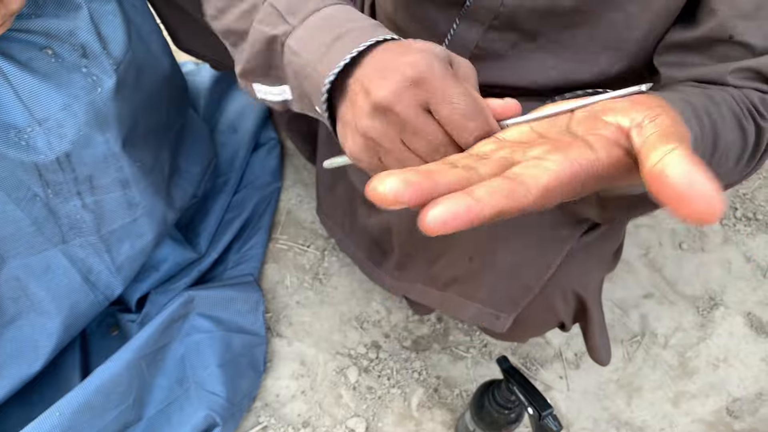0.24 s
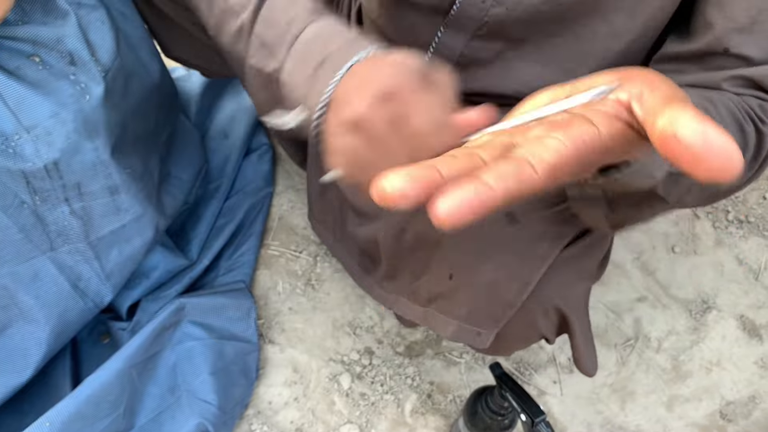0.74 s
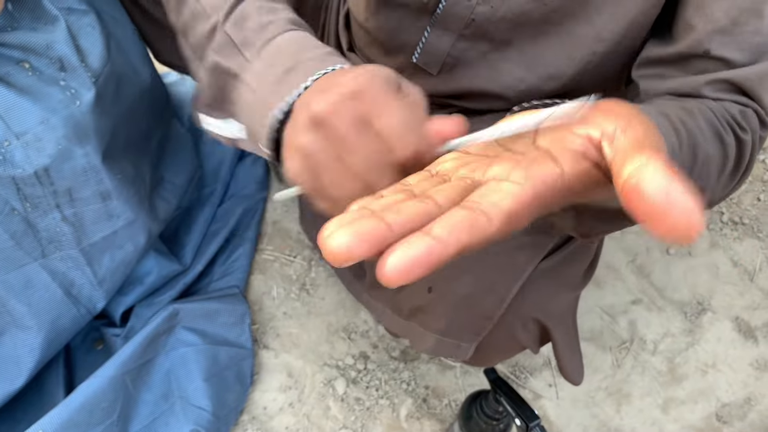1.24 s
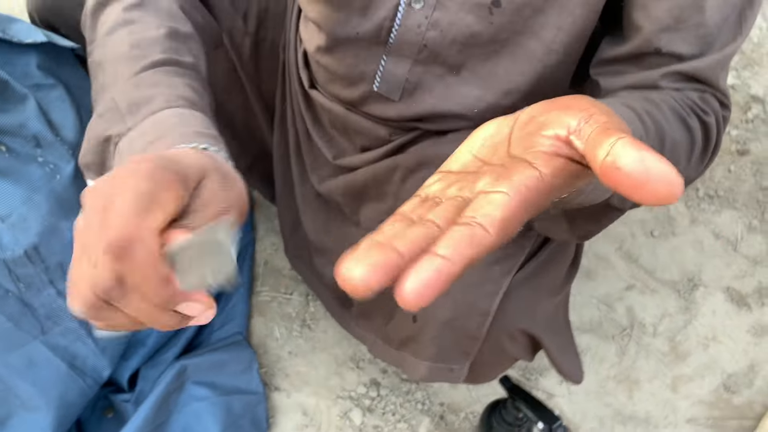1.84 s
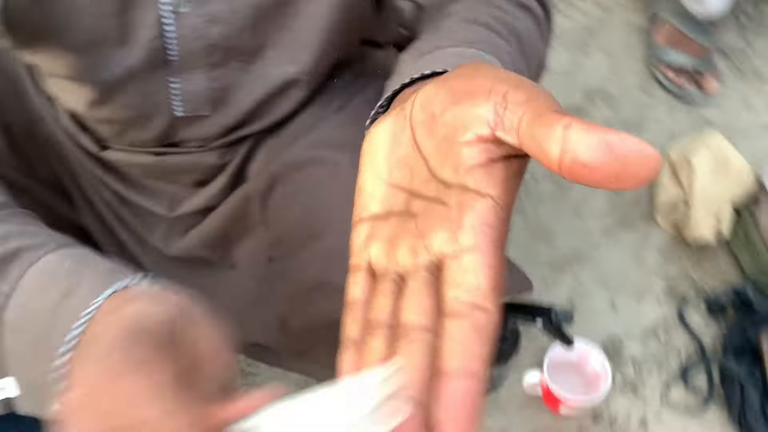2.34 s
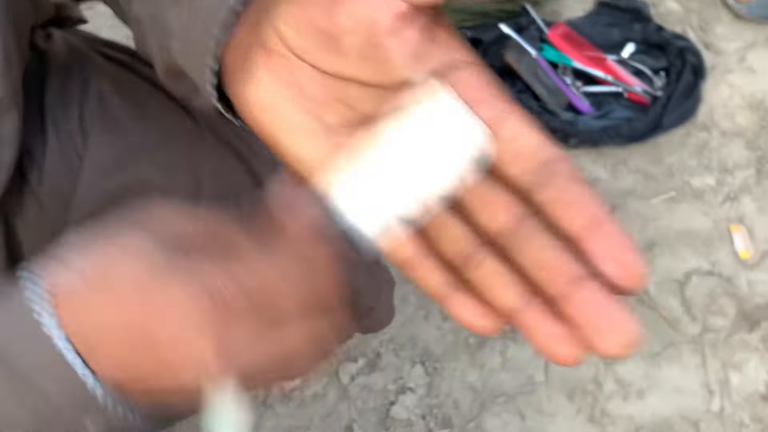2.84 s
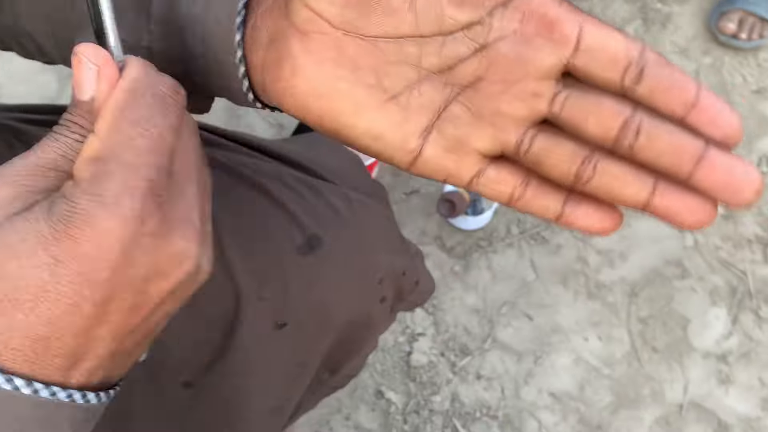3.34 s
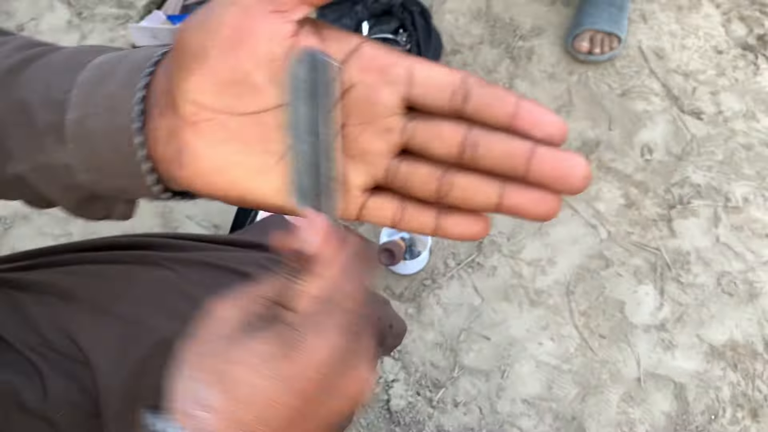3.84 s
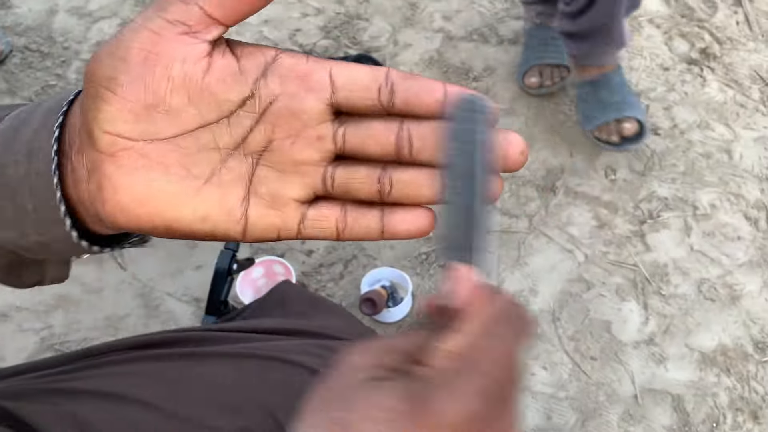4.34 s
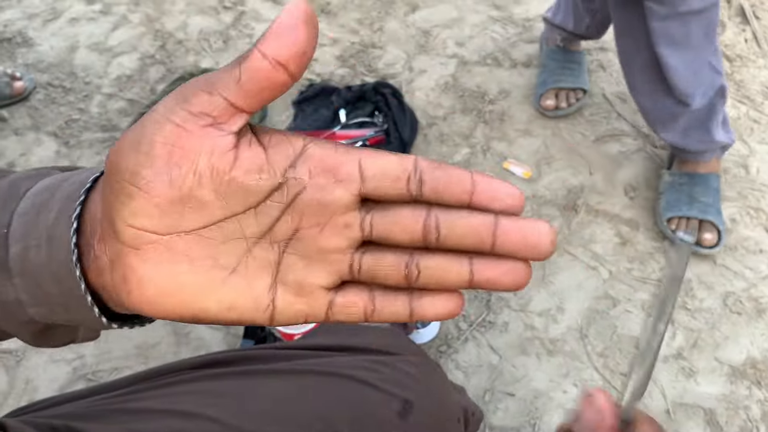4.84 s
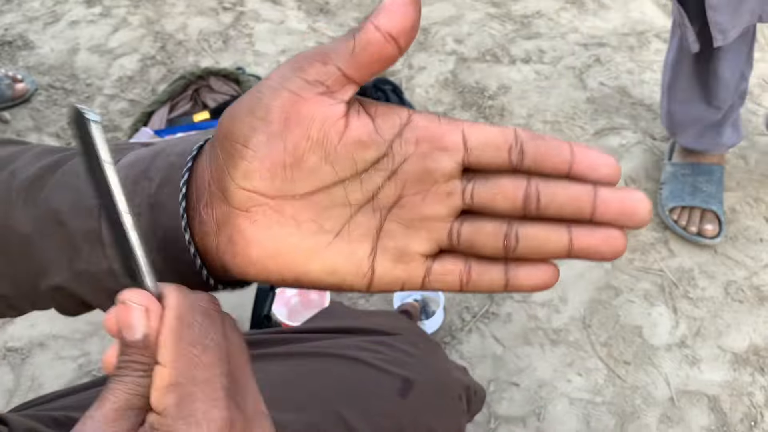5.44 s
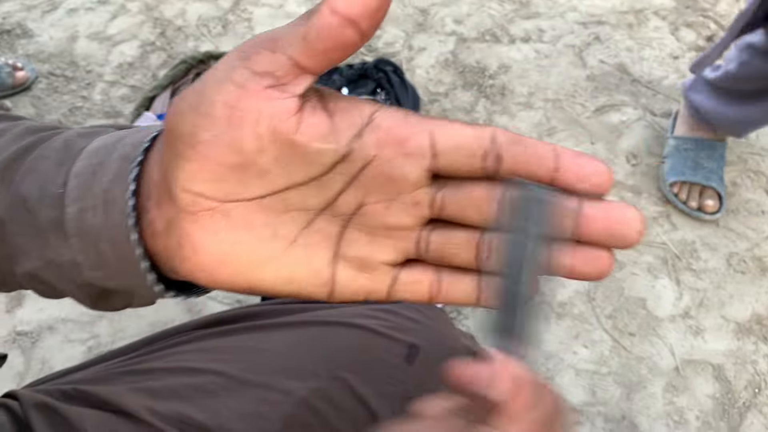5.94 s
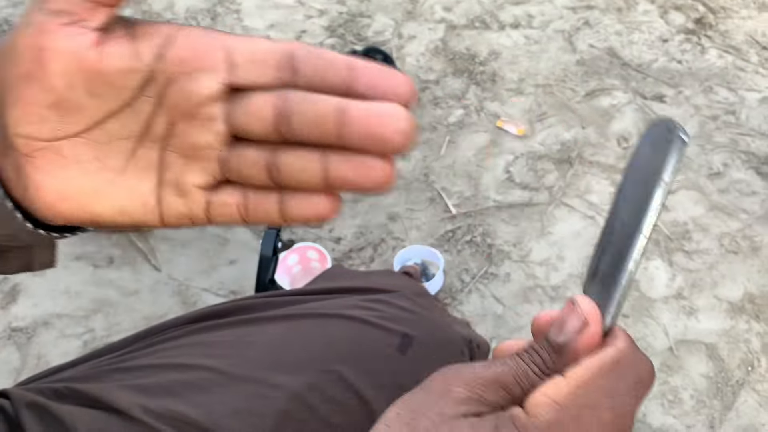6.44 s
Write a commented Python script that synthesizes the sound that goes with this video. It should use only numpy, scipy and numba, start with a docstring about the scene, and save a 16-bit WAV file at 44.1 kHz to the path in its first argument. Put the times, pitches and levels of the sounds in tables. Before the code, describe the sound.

A blade slaps and scrapes over skin in a steady, quick to-and-fro rhythm from start to finish. Each pass is a short, bright, grainy hiss with a squeaky rasp, sometimes snagging, ended by a chattering flick and a fast-dying metallic ring. Early strokes are softer with clearer rings; later ones tick and bite more sharply. Sleeve cloth bumps dully. Distant engine hum and low street rumble, heard by a close handheld phone with almost no reverberation.

```python
"""Outdoors by a quiet street, a straight razor is stropped to and fro on an open palm, close under a phone.
Each stroke lands with a tick and a soft clap (noise bursts), hisses and rasps over the skin (grainy noise,
a sliding resonance), catches here and there, and flicks off so that the thin blade rings (decaying sines).
Far off lie an engine of two wavering lines, a murmur of filtered noise and a thin whine.
Two microphone ports hear it, the right one nearer and resonant."""
import sys
import numpy as np
from scipy import signal
from scipy.fft import rfft, irfft
from scipy.io import wavfile
from scipy.ndimage import uniform_filter1d
from numba import njit

SR = 44100
rng = np.random.default_rng(int(sys.argv[2]) if len(sys.argv) > 2 else 0)


def master_out(mix):
    """Clip the mix to full scale and print it as 16-bit PCM to the path in sys.argv[1]."""
    frames = np.transpose(np.atleast_2d(mix))
    ceiling = np.clip(frames, -1, 1)
    pcm = np.round(ceiling * 32767).astype(np.int16)
    wavfile.write(sys.argv[1], SR, pcm)


N = 294147
T = np.arange(N) / SR

# Far whine. Each row: time in seconds, centre in Hz, level in dB.
WHINE = [(6.2, 2300, -83), (6.42, 2220, -64.5), (6.52, 2130, -65), (6.6, 1850, -71), (6.67, 1780, -74)]
# Street murmur over time. Each row: time in seconds, level in dB before its wander and the pan.
STREET_LEVEL = [(0, -51), (.25, -56.5), (.6, -52), (1.5, -50.5), (2.5, -47.5), (3.3, -45.5), (4.2, -48.5),
                (5.2, -53), (6, -48), (6.67, -53)]
# Distant engine, two lines creeping upward. Each row: first pitch in Hz, rise in Hz per second,
# level in dB about the engine's.
ENGINE_LINES = [(61.6, 1.3, -2.5), (55.2, 0.31, -7)]
# Engine over time. Each row: time in seconds, level in dB before its waver and the pan.
ENGINE_LEVEL = [(0, -47), (.5, -52), (1, -39), (1.5, -47.5), (2, -43), (3, -44), (4, -43.5), (5, -40),
                (5.5, -47.5), (6, -51.5), (6.67, -52)]
# Spectra of the noises; only the shape counts. Each row: frequency in Hz, density in dB per Hz.
STREET = [(20, -15), (48, 7), (75, 4.5), (110, -7.5), (200, -14.5), (400, -21.5), (800, -27.5), (1150, -25),
          (1600, -32.5), (2150, -29.5), (3000, -35.5), (6000, -39), (15800, -41), (16500, -98)]
BUMP = [(70, -25.5), (130, 3.5), (210, -2), (330, -12.5), (600, -28.5), (1500, -36)]
TICK = [(5000, -43), (7500, -30.5), (9200, 2.5), (10500, 1.5), (13000, 6), (13900, -9), (15300, 7.5),
        (16300, -13.5), (17000, -50.5)]
CLAP = [(350, -11.5), (750, -6.5), (1100, -0.5), (1500, 2.5), (2000, -6.5), (3200, -6.5), (6000, -37.5)]
THUD = [(70, -5.5), (150, -4), (280, -3.5), (450, 5.5), (700, -2), (1200, -20), (3000, -37)]
HISS = [(5500, -34.5), (7200, -4), (8200, -10.5), (10200, 7.5), (12600, 1.5), (13900, -3.5), (15300, 8),
        (15750, -26), (16100, -53)]
RASP = [(1800, -17), (2500, -7), (3000, -7), (3500, 2), (4600, -0.5), (5400, 0), (6400, 7.5), (7300, 5.5),
        (8600, -10), (11000, -47.5)]
RUB = [(80, -25), (180, 1), (350, -2), (800, 2.5), (1200, 6), (2200, -1.5), (3500, -2.5), (6000, -40)]
# The blade's modes above its main ring. Each row: frequency in Hz when the ring is at BLADE_HZ,
# relative level in dB, time to fall 60 dB in seconds.
BLADE = [(3530, -5, .055), (4810, -2, .045), (6230, -2, .04), (7730, -4, .05), (9555, 0, .07),
         (11785, 4, .1), (13300, -7, .06), (15190, 1, .06)]
# Strokes towards the wrist, set down lightly, swelling and flicked off. Each row: start, end and hardest
# pressure in seconds (if past the end, it is never reached), rasp pitch there in Hz, then in dB: touch,
# scrape, flick, ring and brightness (added to the hiss). Scrape, flick and ring are reference levels.
INWARD = [(0, .04, 0.013, 3800, -42, -30, -18, -16, -5.5),
          (.532, 0.615, 0.554, 4220, -50, -32.5, -18.5, -19, -5.5),
          (1.01, 1.092, 1.05, 3850, -30, -31.5, -21.5, -24.5, -5.5),
          (1.481, 1.559, 1.52, 3970, -31, -31.5, -24, -30.5, -5),
          (1.908, 1.984, 2.01, 4420, -35, -31.5, -20, -22.5, -4.5),
          (2.373, 2.448, 2.55, 4640, -29.5, -31.5, -25, -23.5, -2),
          (2.797, 2.878, 2.86, 3800, -27.5, -31.5, -23.5, -35, -1.5),
          (3.224, 3.302, 3.28, 3930, -23.5, -30, -19, -39, 1),
          (3.647, 3.727, 3.8, 4300, -30, -29, -24, -60, -2),
          (4.061, 4.154, 4.04, 3980, -25, -28.5, -21.5, -34.5, -3),
          (4.498, 4.586, 4.56, 4810, -21, -28.5, -18, -35, 0),
          (4.92, 4.997, 5.12, 3600, -28, -30, -13, -40, -3.5),
          (5.338, 5.42, 5.3, 4920, -26.5, -29.5, -15, -27.5, -0.5),
          (5.729, 5.809, 5.75, 4160, -26.5, -30, -19, -44, 0.5),
          (6.133, 6.209, 6.4, 4300, -20.5, -33.5, -14.5, -51, 3.5)]
# Strokes towards the fingers: slap on the heel of the hand, glide, bite, run off. Each row: slap, glide,
# bite and end in seconds, then in dB: steel tick, skin clap, palm thud, bite, scrape, flick, ring and
# brightness (added to the hiss). Bite, scrape, flick and ring are reference levels.
OUTWARD = [(0.1439, 0.302, 0.38, .42, -25.5, -41, -45.5, -41, -37, -43, -50, 2),
           (0.7092, .785, .856, .921, -20, -41.5, -51, -34, -41, -34.5, -42, 3.5),
           (1.1734, 1.242, 1.304, 1.356, -23.5, -41, -42.5, -27.5, -35.5, -52, -50, 2.5),
           (1.664, 1.657, 1.729, 1.792, -13.5, -42.5, -41.5, -33.5, -41.5, -44, -61, 4),
           (2.0713, 2.158, 2.172, 2.262, -27.5, -37.5, -51, -29.5, -32, -40.5, -49, 2.5),
           (2.549, 2.537, 2.628, 2.7, -17, -33.5, -32.5, -23, -40, -32.5, -37, 8),
           (2.972, 2.993, 3.038, 3.096, -13.5, -35.5, -54, -20.5, -34.5, -36, -43, 4),
           (3.391, 3.426, 3.476, 3.537, -14, -42, -52, -36.5, -31.5, -56, -55, 2.5),
           (3.822, 3.822, 3.882, 3.936, -18.5, -36, -39, -23.5, -34, -27, -63, 3.5),
           (4.242, 4.251, 4.317, 4.371, -18.5, -42.5, -46.5, -23.5, -34, -26.5, -46, 0.5),
           (4.66, 4.677, 4.722, 4.769, -14.5, -52, -48.5, -22, -30.5, -19, -26, 2.5),
           (5.0813, 5.084, 5.142, 5.182, -14, -37, -43.5, -20, -30.5, -15, -35, 1.5),
           (5.4974, 5.487, 5.571, 5.603, -15.5, -45.5, -54, -24, -31.5, -25, -43, 1),
           (5.88, 5.88, 5.946, 5.973, -12, -40.5, -44.5, -16.5, -28, -18, -31.5, 2),
           (6.2935, 6.291, 6.36, 6.388, -12.5, -35, -43.5, -20.5, -29.5, -23.5, -36, 2.5)]
# Stray taps as the blade is turned over. Each row: time in seconds, steel tick in dB, skin clap in dB.
TAPS = [(0.6727, -44, -59), (1.635, -31, -51.5), (1.8272, -36, -55.5), (1.853, -33.5, -68),
        (2.0408, -29.5, -48), (2.0567, -36, -48), (2.296, -37, -58.5), (2.346, -37.5, -65),
        (3.183, -34.5, -63), (4.022, -26, -77), (4.4157, -39, -57), (4.441, -26, -60)]
# The edge snags hard on a crease. Each row: time in seconds, reference level in dB, brightness in dB.
SNAGS = [(1.063, -30, -8), (1.537, -27, -1), (2.398, -36.5, 18), (2.651, -35, 7), (3.898, -34.5, 4),
         (4.106, -29.5, -1), (4.329, -28, 10), (4.738, -22, -9), (5.957, -23.5, 3), (6.15, -40, 21),
         (6.165, -39, 17), (6.182, -31, 3.5)]

# friction about the scrape level, in dB: inward at start, hardest, end; outward at glide, grip, bite, end
IN_HISS_DB, IN_RASP_DB, IN_RUB_DB = (-9.5, 0.5, -5.5), (-10, -2, 1), (-25, -24, -22.5)
OUT_HISS_DB, OUT_RASP_DB = (-4, -9.5, -1, -5), (-12.5, -14.5, -3.5, 1.5)
OUT_RUB_DB = (-20, -24, -17.5, -25)
# the rasp's resonance: at an inward start and end, at the four outward points, and in a bite
IN_START_HZ, IN_END_HZ, OUT_RASP_HZ, BITE_HZ = 5650, 4700, (5040, 5870, 5370, 3800), 5450
RASP_Q, RASP_WANDER = 3.5, .1  # wander in natural log of pitch
GRIP_S = 0.028  # the grip of an outward stroke starts to build this long before it bites
TOUCH_CLAP_DB, LIGHT_THUD_DB = -28, -2  # clap about a light touch's tick; thud about a light clap
GRIT_DB, GRIT_SPREAD_DB = -8.5, 1.5  # chance snags about the scrape (inward) or bite (outward)
BLADE_HZ, RING_SPREAD_HZ = 5360, 27
RING_T60_S, RING_REF_DB, RING_T60_DOUBLES_DB = .14, -34.5, 21.5  # the louder a ring, the faster it dies
# overtone level at RING_REF_DB, its spread, and its rise in dB per dB of the ring
OVERTONE_DB, OVERTONE_SPREAD_DB, OVERTONE_SHARE = -46.5, 5, 0.213
IN_RING_PAN_DB, OUT_RING_PAN_DB = -3, 3.5  # main ring, left minus right
TWIRL_DB, TWIRL_PER_S = 3, 45  # the ring flutters as the blade is turned
SLEEVE_LAG_S, SLEEVE_DB = .022, -25  # after each contact, about the scrape level
SCATTER_T60_S = .24
PORT_LAG = 8  # samples by which the left port hears later
TOP_HZ = 16700


def undb(db):
    """Decibels to gain."""
    return 10 ** (np.asarray(db) / 20)


def unit(x):
    """Scale to rms 1."""
    return x / np.sqrt(np.mean(x ** 2))


def add(out, s, sound):
    """Mix a short sound in at time s."""
    i = max(int(s * SR), 0)
    out[:, i:i + sound.shape[-1]] += sound[..., :N - i]


def colour(x, points, size=1024):
    """Causal, minimum-phase filter through (Hz, dB) points that keeps the power of white noise."""
    hz, db = np.transpose(points)
    f = np.maximum(np.arange(size // 2 + 1) * SR / size, 1)
    cepstrum = irfft(np.log(undb(np.interp(np.log(f), np.log(hz), db))))
    # fold the cepstrum forward in time so that nothing sounds early
    cepstrum[1:size // 2] *= 2
    cepstrum[size // 2 + 1:] = 0
    response = irfft(np.exp(rfft(cepstrum)))
    response = response / np.linalg.norm(response)
    return signal.fftconvolve(x, response[None], axes=1)[:, :N]


def pair(apart, count=N):
    """Two white noises of rms 1: alike at apart 0, unrelated at 1."""
    mid, side = rng.standard_normal((2, count))
    return np.array([mid + apart * side, mid - apart * side]) / np.sqrt(1 + apart ** 2)


def walk(rate):
    """Smooth random wander of spread 1, with about rate new values a second."""
    k = max(int(SR / rate), 2)
    steps = np.repeat(rng.standard_normal(N // k + 1), k)
    return unit(uniform_filter1d(steps, k)[:N])


@njit
def sweep(x, hz, q):
    """Band-pass whose centre moves every sample."""
    y = np.empty_like(x)
    for c in range(2):
        band, low = 0., 0.
        for i in range(x.shape[1]):
            g = np.tan(np.pi * hz[i] / SR)
            v = (band + g * (x[c, i] - low)) / (1 + g * (g + 1 / q))
            band, low, y[c, i] = 2 * v - band, low + 2 * g * v, v / q
    return y


def bursts(times, levels_db, rise_s, fall_s, span_s, apart):
    """Clusters of micro-slips that swell to each time and die; the level is their rms over span_s."""
    out, lead = np.zeros((2, N)), .02
    t = np.arange(int(4 * lead * SR)) / SR - lead
    shape = np.exp(np.where(t < 0, t / rise_s, -t / fall_s))
    for s, db in zip(times, levels_db):
        slips = unit(pair(apart, count=len(t)) * shape)
        add(out, s - lead, slips * undb(db) * np.sqrt(span_s * SR / len(t)))
    return out


def whine():
    """A thin, narrow band of noise far away, sinking in pitch at the end."""
    s, hz, db = np.transpose(WHINE)
    band = sweep(pair(.5), np.interp(T, s, hz), 25.)
    return unit(band) * undb(np.interp(T, s, db))


def drone(hz, rise_hz_per_s, db, waver_db=2.5):
    """One wavering line of a far engine, a sine that creeps upward."""
    phase = 2 * np.pi * (np.cumsum(hz + rise_hz_per_s * T) / SR + rng.random())
    level_db = db + np.interp(T, *np.transpose(ENGINE_LEVEL)) + waver_db * walk(12)
    return np.sqrt(2) * np.sin(phase) * undb(level_db)


def street():
    """Low rumble and a faint murmur with the far engine, a little to the left."""
    gain = undb(np.interp(T, *np.transpose(STREET_LEVEL)) + 1.44 * walk(9))
    murmur = colour(pair(.25), STREET, size=8192) * gain
    engine = sum(drone(*line) for line in ENGINE_LINES)
    return (murmur + engine) * undb(np.array([[1.0], [-1.0]]))


def sleeve():
    """Loose cloth flaps dully with the swing of the arm, just after each contact."""
    s, scrape_db = np.transpose([(start, db) for start, *_, db, _, _, _ in INWARD + OUTWARD])
    flaps = bursts(s + SLEEVE_LAG_S, scrape_db + SLEEVE_DB,
                   rise_s=0.0084, fall_s=0.0038, span_s=0.029, apart=0.15)
    return colour(flaps, BUMP)


def landings(rasp_db=-7):
    """Steel meets the palm: a sharp tick with some rasp, then the clap of skin and the thud of flesh."""
    slaps = [(s, tick, clap, thud) for s, _, _, _, tick, clap, thud, *_ in OUTWARD]
    light = [(s, tick, tick + TOUCH_CLAP_DB) for s, _, _, _, tick, *_ in INWARD] + TAPS
    slaps += [(s, tick, clap, clap + LIGHT_THUD_DB) for s, tick, clap in light]
    s, tick_db, clap_db, thud_db = np.transpose(slaps)
    tick = bursts(s, tick_db, rise_s=0.00033, fall_s=0.00099, span_s=0.0011, apart=0.068)
    rasp = bursts(s, tick_db + rasp_db, rise_s=0.00031, fall_s=0.0027, span_s=0.00066, apart=1.0)
    clap = bursts(s + 0.00044, clap_db, rise_s=0.00013, fall_s=0.0018, span_s=0.015, apart=0.26)
    thud = bursts(s + 0.0011, thud_db, rise_s=0.00014, fall_s=0.0026, span_s=0.01, apart=0.18)
    return colour(tick, TICK) + colour(rasp, RASP) + colour(clap, CLAP) + colour(thud, THUD)


def chatter(x, q=45, direct_db=-3):
    """Quick slips on the nearly free blade take on the colour of its modes."""
    ringing = 0
    for hz, db, _ in BLADE:
        ringing = ringing + undb(db) * signal.lfilter(*signal.iirpeak(hz, q, fs=SR), x, axis=1)
    return unit(unit(ringing) + undb(direct_db) * unit(x)) * x.std()


def blade_ring(flick_ring_db, pan_db):
    """The freed blade rings in its modes, each a dying sine; their pitch shifts together with the grip."""
    t = np.arange(int(.3 * SR)) / SR
    swell = 1 - np.exp(-t / 0.0007)
    main_hz = BLADE_HZ + RING_SPREAD_HZ * rng.standard_normal()
    main_t60 = RING_T60_S * 2 ** ((RING_REF_DB - flick_ring_db) / RING_T60_DOUBLES_DB)
    main_db = flick_ring_db - 8 + np.array([[pan_db], [0]])
    over_db = OVERTONE_DB + OVERTONE_SHARE * (flick_ring_db - RING_REF_DB)
    modes = [(main_hz, main_db, main_t60)]
    for hz, db, t60 in BLADE:
        mode_db = over_db + db + OVERTONE_SPREAD_DB * rng.standard_normal()
        modes.append((hz * main_hz / BLADE_HZ, mode_db, t60))
    ring = np.zeros((2, len(t)))
    for hz, db, t60 in modes:
        wave = np.sqrt(2) * np.sin(2 * np.pi * (hz * t + rng.random()))
        ring += undb(db) * swell * wave * np.exp(-np.log(1000) * t / t60)
    return ring


def flicks(hiss_db=2.0, rasp_db=-1.0):
    """The edge chatters off the hand and the freed blade rings."""
    rows = [(end, db, ring, bright, IN_RING_PAN_DB) for _, end, *_, db, ring, bright in INWARD]
    rows += [(end, db, ring, bright, OUT_RING_PAN_DB) for _, _, _, end, *_, db, ring, bright in OUTWARD]
    s, db, _, bright, _ = np.transpose(rows)
    hiss = bursts(s - .001, db + bright + hiss_db, rise_s=0.0033, fall_s=0.0048, span_s=0.0018, apart=0.13)
    rasp = bursts(s - .001, db + rasp_db, rise_s=0.0022, fall_s=0.0036, span_s=0.0025, apart=0.59)
    rings = np.zeros((2, N))
    for end, _, ring_db, _, pan_db in rows:
        add(rings, end - .001, blade_ring(ring_db, pan_db))
    flutter = undb(TWIRL_DB * walk(TWIRL_PER_S))
    return chatter(colour(hiss, HISS) + colour(rasp, RASP)) + rings * flutter


def squeaks(x, count=6):
    """Several spots of the edge grip at once; each sings in and out at its own drifting pitch."""
    out = 0
    for hz in np.geomspace(3150, 7000, count):
        centre = hz * np.exp(.07 * walk(35))
        out = out + sweep(np.ascontiguousarray(x), centre, 22.) * undb(5 * walk(60))
    return unit(out)


def rasping(x, times, hz, q, broad_db, wander, squeak_db=0):
    """The blade's pitch under the skin depends on where it is pressed: a resonance slides through the rasp."""
    centre = np.exp(np.interp(T, times, np.log(hz)) + wander * walk(70))
    broad = colour(x, RASP)
    broad = unit(broad) + undb(squeak_db) * squeaks(broad)
    ringing = sweep(np.ascontiguousarray(broad), np.clip(centre, 2000, 9000), float(q))
    return unit(unit(ringing) + undb(broad_db) * unit(broad)) * x.std()


def catches(hiss_db=-3.5, rasp_db=-1, count=3):
    """The edge bites once on each way out and snags on creases and grit; it squeaks briefly and slips on."""
    rows = SNAGS + [(bite, db, bright) for _, _, bite, *_, db, _, _, _, bright in OUTWARD]
    # spans where small chance snags may fall
    spans = [(start, end, db, bright) for start, end, *_, db, _, _, bright in INWARD]
    spans += [(bite, end, db, bright) for _, _, bite, end, *_, db, _, _, _, bright in OUTWARD]
    for start, end, db, bright in spans:
        for _ in range(count):
            grit_db = db + GRIT_DB + GRIT_SPREAD_DB * rng.standard_normal()
            rows.append((rng.uniform(start, end), grit_db, bright))
    s, db, bright = np.transpose(rows)
    hiss = bursts(s - .0005, db + bright + hiss_db, rise_s=.0005, fall_s=0.0018, span_s=0.0021, apart=0.15)
    rasp = bursts(s - .0005, db + rasp_db, rise_s=0.0017, fall_s=0.0032, span_s=0.0021, apart=0.51)
    rasp = rasping(rasp, [0], [BITE_HZ], q=RASP_Q, broad_db=-7, wander=RASP_WANDER, squeak_db=-5.5)
    return colour(hiss, HISS) + rasp


def courses():
    """For every stroke: its turning times, then hiss, rasp and rub dB and the rasp's Hz at those times."""
    rows = []
    for start, end, hardest, hz, _, db, _, _, bright in INWARD:
        hiss_db = db + bright + np.array(IN_HISS_DB)
        rasp_db, rub_db = db + np.array(IN_RASP_DB), db + np.array(IN_RUB_DB)
        rows.append(([start, hardest, end], hiss_db, rasp_db, rub_db, (IN_START_HZ, hz, IN_END_HZ)))
    for _, glide, bite, end, *_, db, _, _, bright in OUTWARD:
        times = [glide, max(bite - GRIP_S, glide), bite, end]
        hiss_db = db + bright + np.array(OUT_HISS_DB)
        rasp_db, rub_db = db + np.array(OUT_RASP_DB), db + np.array(OUT_RUB_DB)
        rows.append((times, hiss_db, rasp_db, rub_db, OUT_RASP_HZ))
    return zip(*sorted(rows, key=lambda row: row[0][0]))


def pressure(times, levels_db, rise_db_per_s, fall_db_per_s):
    """Gain of the strokes: a quick rise, the course of the pressure, then fading as the blade lifts."""
    gain = np.zeros((1, N))
    for s, db in zip(times, levels_db):
        t = np.arange(max(s[0] - .02, 0), s[-1] + .12, 1 / SR)
        fade_db = rise_db_per_s * np.maximum(s[0] - t, 0) + fall_db_per_s * np.maximum(t - s[-1], 0)
        add(gain, t[0], undb(np.interp(t, s, db) - fade_db))
    return gain


def friction(ridge_db=3.5, grain_db=2.5, judder_db=2.5):
    """The edge slips over skin ridges in tiny grains; the gripping edge judders and rasps."""
    times, hiss_db, rasp_db, rub_db, hz = courses()
    grain = unit(undb(ridge_db * walk(170) + grain_db * walk(1500)))
    judder = unit(undb(judder_db * walk(170)))
    hiss = pressure(times, hiss_db, rise_db_per_s=3500, fall_db_per_s=741) * grain * pair(0.06)
    rasp = pressure(times, rasp_db, rise_db_per_s=3989.5, fall_db_per_s=1199.5) * grain * judder * pair(1.0)
    rub = pressure(times, rub_db, rise_db_per_s=1489, fall_db_per_s=588) * grain * pair(0.47)
    rasp = rasping(rasp, np.concatenate(times), np.concatenate(hz),
                   q=RASP_Q, broad_db=-3.5, wander=RASP_WANDER, squeak_db=4)
    return undb(-0.5) * colour(hiss, HISS) + undb(-3) * rasp + undb(1.5) * colour(rub, RUB)


def palm_echo(x, delay_s=0.0004244, wander=0.313, share=0.63):
    """The palm mirrors the sound; as the blade moves, the comb of notches shifts, differently at each port."""
    mirrored = [np.interp(T - delay_s * np.exp(wander * walk(14)), T, channel) for channel in x]
    return (x + share * np.array(mirrored)) / np.sqrt(1 + share ** 2 / 2)


def surroundings(x, wet_db=-29):
    """Faint scatter from the ground, clothes and nearby walls: a decaying noise tail."""
    t = np.arange(SR // 3) / SR
    decay = np.exp(-np.log(1000) * t / SCATTER_T60_S) * (t > .003)
    tail = unit(rng.standard_normal((2, len(t))) * decay) / np.sqrt(len(t))
    return x + undb(wet_db) * signal.fftconvolve(x, tail, axes=1)[:, :N]


def scene():
    """The razor is nearer the right port, so the left hears it a little later."""
    strokes = palm_echo(friction() + catches() + flicks())
    left, right = surroundings(strokes + landings())
    razor = np.array([np.pad(left, (PORT_LAG, 0))[:N], right])
    return whine() + street() + sleeve() + razor


def record(dry, port_hz=5380, port_q=15.9, port_boost=2.81):
    """The right microphone port resonates; the top is cut in both."""
    resonance = signal.lfilter(*signal.iirpeak(port_hz, port_q, fs=SR), dry[1])
    heard = np.array([dry[0], dry[1] + port_boost * resonance])
    return signal.sosfilt(signal.ellip(8, .2, 70, TOP_HZ, fs=SR, output="sos"), heard)


dry = scene()
out = record(dry)
master_out(out)
```